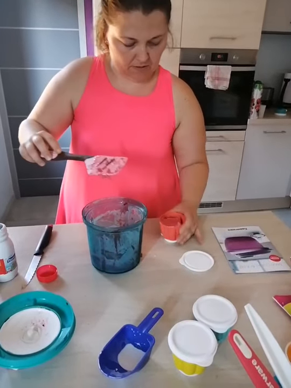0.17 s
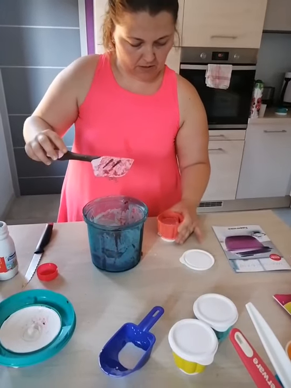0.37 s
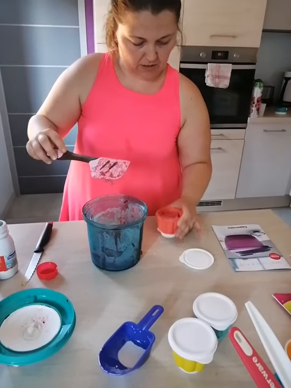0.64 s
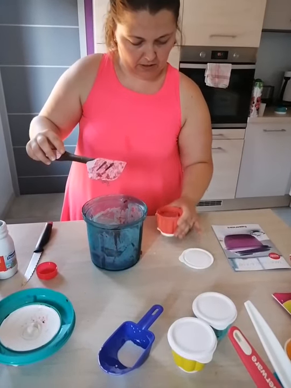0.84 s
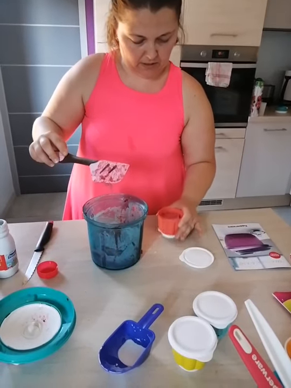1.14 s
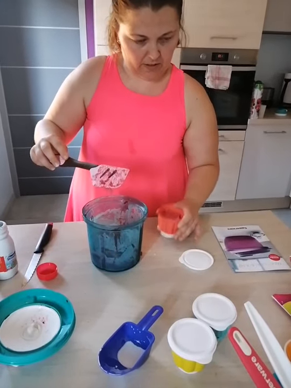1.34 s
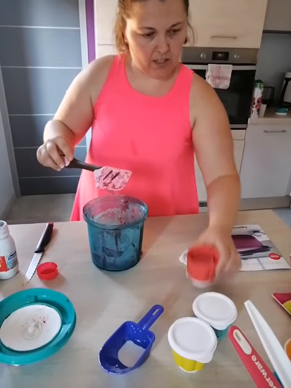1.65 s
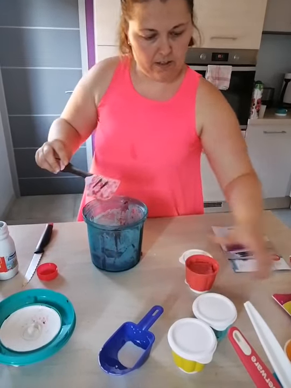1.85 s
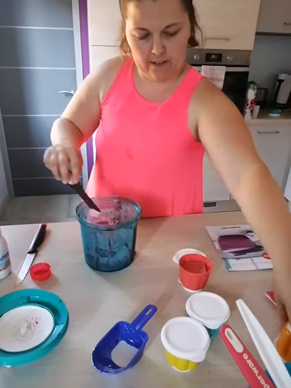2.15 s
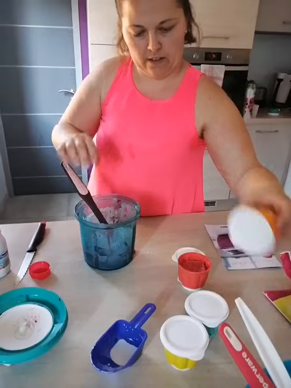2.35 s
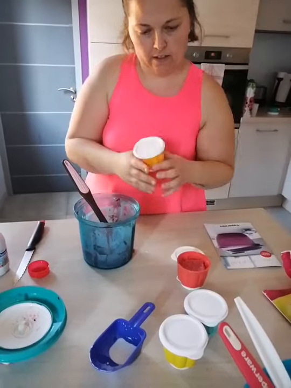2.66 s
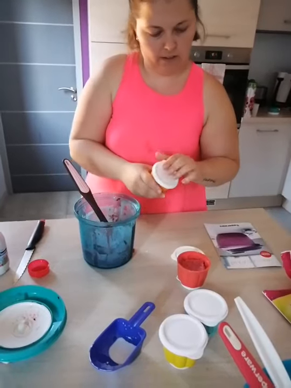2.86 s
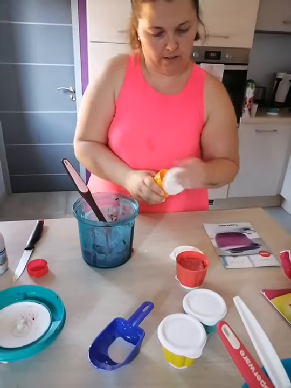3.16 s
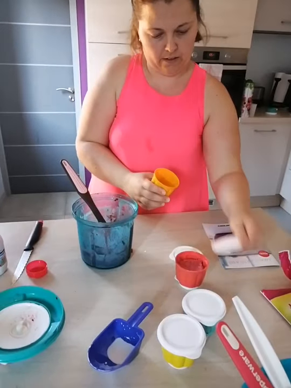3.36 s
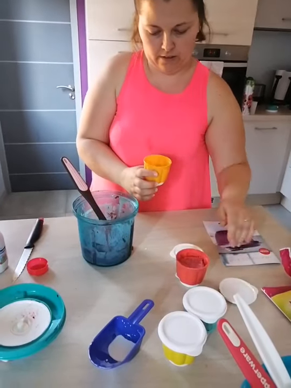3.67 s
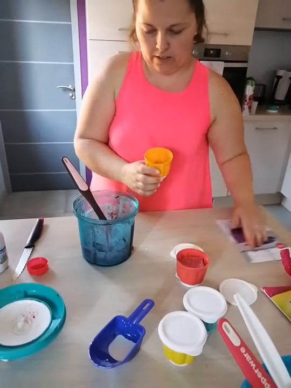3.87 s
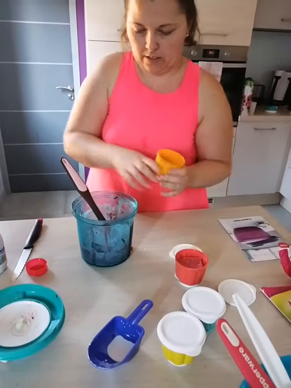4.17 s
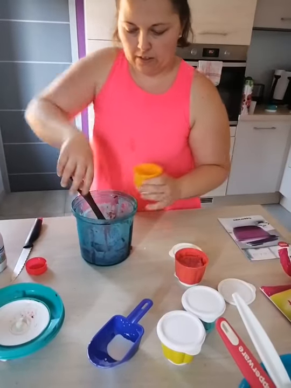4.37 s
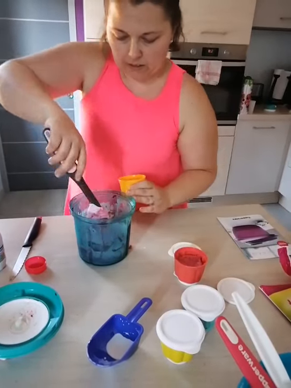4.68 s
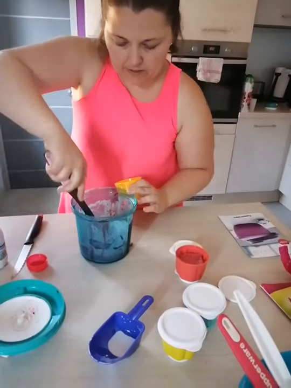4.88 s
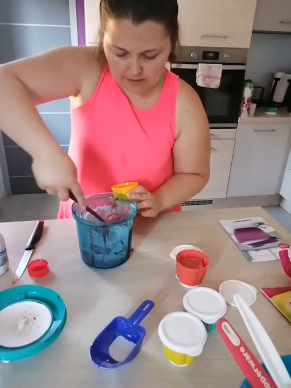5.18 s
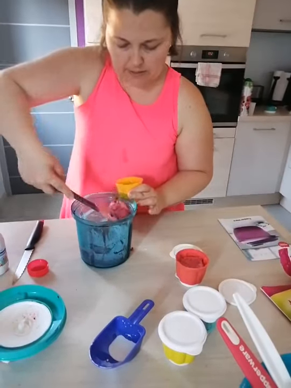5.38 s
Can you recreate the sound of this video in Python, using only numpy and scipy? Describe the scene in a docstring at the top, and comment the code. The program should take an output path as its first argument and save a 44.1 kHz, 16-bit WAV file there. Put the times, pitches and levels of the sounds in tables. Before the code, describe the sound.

In a slightly echoing kitchen, seven loud, hollow knocks of a plastic mould on the counter come first, then a softer thud as it is put down. After the light rattle of a spatula landing in a jug, another mould's lid comes off with a small pop and clatters onto the counter. A short paper rustle and plastic ticks lead into quiet bumping and scraping in the jug.

```python
"""A faint room ring lingers from an earlier knock. A filled plastic mould is knocked seven times on a
kitchen worktop and set down; each impact excites the modes of mould and slab. A spatula drops into a jug.
Fingers rub and thump a second mould, whose lid pops off with a rising air resonance and clatters down.
Paper rustles, plastic ticks, and the spatula bumps and scrapes round the jug by stick-slip friction.
The hard-walled kitchen reverberates after every blow, over a faint steady rumble and hiss."""
import sys
import numpy as np
from scipy import signal
from scipy.fft import rfft, irfft, next_fast_len
from scipy.io import wavfile

SR = 44100
rng = np.random.default_rng(int(sys.argv[2]) if len(sys.argv) > 2 else 0)


def unload_audio(sound):
    """Save the sound as a 16-bit wav file, at the path given as the first command line argument."""
    columns = np.transpose(np.atleast_2d(sound))
    # keep every value between -1 and 1, then stretch to whole-number steps
    steps = np.round(np.clip(columns, -1, 1) * 32767)
    wavfile.write(sys.argv[1], SR, steps.astype(np.int16))


N = 243340
NOW = np.arange(N) / SR  # seconds through the scene
T = np.arange(SR * 3 // 4) / SR  # seconds after a blow


def amp(db):
    """Amplitude ratio of a level in decibels."""
    return 10 ** (np.asarray(db) / 20)


def unit(x):
    """Normalisation to rms 1."""
    return x / np.sqrt(np.mean(x ** 2) + 1e-20)


def along(points, hz):
    """Interpolation of (Hz, value) points on a logarithmic frequency axis."""
    freqs, values = np.transpose(points)
    return np.interp(np.log(hz + 1), np.log(freqs), values)


def fade(t, t60):
    """Exponential decay: 60 dB lost in t60 seconds."""
    return np.exp(-np.log(1000) * t / t60)


def coloured(x, tone):
    """Minimum-phase filtering by a tone curve. Each row of a tone: frequency in Hz, gain in dB."""
    m = 2 * next_fast_len(len(x))
    cepstrum = irfft(np.log(amp(along(tone, np.fft.rfftfreq(m, 1 / SR)))), m)
    cepstrum[1:m // 2] *= 2  # folding onto positive time makes the filter causal
    cepstrum[m // 2 + 1:] = 0
    return irfft(rfft(x, m) * np.exp(rfft(cepstrum)), m)[:len(x)]


def add(track, start, sound):
    """Superposition: a sound joins the track at start seconds."""
    part = track[round(start * SR):][:len(sound)]
    part += sound[:len(part)]


def stroke(start, length, attack, release):
    """Amplitude envelope: linear rise, hold, then 60 dB of decay over the release; all in seconds."""
    return np.clip((NOW - start) / attack, 0, 1) * fade(np.maximum(NOW - start - length, 0), release)


def ring(modes, scatter_db, attack):
    """Free vibration: a sum of damped modes, struck at slightly new strengths each time."""
    waves = sum(amp(db + scatter_db * rng.normal()) * fade(T, t60) * np.sin(2 * np.pi * hz * T)
                for hz, db, t60 in modes)
    return waves * (1 - np.exp(-T / attack))


def crack(tone, t60, spike):
    """Impulsive excitation: a contact spike, then dense, quickly damped vibration."""
    grain = rfft(rng.standard_normal(len(T)) * fade(T, t60))
    # a short blow feeds all frequencies evenly; only their timing is left to chance
    dense = irfft(grain / np.abs(grain), len(T)) * fade(T, 4 * t60)
    dense[0] += spike
    blow = coloured(dense, tone)
    return blow / np.linalg.norm(blow) * np.sqrt(SR / 100)  # the energy of 10 ms at rms 1


def grainy_noise(tone, grain_db, clump_hz):
    """Random amplitude modulation: noise in clumps of varying size, as in friction; rms 1."""
    clumps = np.interp(NOW * clump_hz, np.arange(N), rng.standard_normal(N))
    return unit(coloured(rng.standard_normal(N) * amp(grain_db * clumps), tone))


def echoes(gap, early):
    """Room impulse response: strong near-wall reflections build over gap seconds, then a tail decays."""
    # Each row: frequency in Hz, reverberation time in seconds.
    decay_times = [(100, 0.24), (260, 0.56), (800, 0.77), (2000, 0.7), (5000, 0.69), (8000, 0.51),
                   (13000, .33)]
    # Each row: frequency in Hz, gain of the reverberation in dB.
    room_tone = [(60, -0.5), (170, -6.5), (300, -4), (550, -4), (900, -4.5), (2500, -4.5), (10000, -2)]
    hz, t, spectra = signal.stft(rng.standard_normal(len(T)), SR, nperseg=256)
    spectra = spectra * fade(t, along(decay_times, hz)[:, None])
    tail = signal.istft(spectra, SR, nperseg=256)[1][:len(T)]
    tail = tail * (1 + early * fade(T, 0.11)) * (1 - np.exp(-(T / gap) ** 2))
    return coloured(tail / np.linalg.norm(tail), room_tone)


def heard(x, room, wet_db):
    """Direct sound plus the reverberant field, its convolution with the room's response."""
    return x + amp(wet_db) * signal.fftconvolve(x, room)[:len(x)]


def room_air():
    """Stationary noise: the faint rumble and hiss of the kitchen."""
    # Each row: frequency in Hz, relative spectral density in dB.
    air_tone = [(12, -31.5), (20, -2.5), (50, -6), (109, -11.5), (202, -9.5), (315, -18.5), (491, -15.5),
                (810, -21), (881, -22), (1500, -27), (1630, -26.5), (1920, -24), (3640, -33.5),
                (9390, -43.5), (15500, -50.5)]
    return amp(-65.5) * unit(coloured(rng.standard_normal(N), air_tone))


def lingering_ring():
    """Reverberation: a faint, low room ring lingers from an earlier knock."""
    # Each row: frequency in Hz, relative spectral density in dB.
    ring_tone = [(59, -20), (100, 0.5), (346, -8.5), (497, -4.5), (741, -15.5), (836, -12), (1490, -20),
                 (2520, -19.5), (12000, -39.5), (15600, -74), (22000, -120)]
    envelope = amp(-62.5) * stroke(0, length=0.21, attack=0.0017, release=0.15)
    return envelope * grainy_noise(ring_tone, grain_db=-0.5, clump_hz=60)


def soft_rubs():
    """Sliding friction: fingers on plastic, a hand on paper, the scrape's first hiss."""
    # Each row: start in seconds, length in seconds, level in dB.
    rubs = [(2.535, 0.085, -72), (2.682, .09, -76.5), (2.994, 0.086, -63.5), (3.842, 0.13, -53),
            (4.136, 0.039, -67), (4.542, 0.038, -70), (4.81, 0.15, -63.5)]
    # Each row: frequency in Hz, relative spectral density in dB.
    rub_tone = [(600, -34), (1500, -5), (2200, -2), (3600, -2.5), (4800, -10.5), (7000, -16.5),
                (11000, -22.5), (15000, -28)]
    sliding = sum(amp(db) * stroke(start, length, attack=0.0053, release=0.33)
                  for start, length, db in rubs)
    rubbing = sliding * grainy_noise(rub_tone, grain_db=1.0, clump_hz=71)
    return heard(rubbing, echoes(gap=0.021, early=0.54), wet_db=-20.5)


def stirring():
    """Stick-slip motion: the blade scrapes the jug, chatters in a glide and drags through the mixture."""
    # Each row: start and length in seconds, scrape and drag levels in dB, chatter in Hz, glide in Hz/s.
    strokes = [(4.804, 0.11, -84, -75, 2060, 0), (4.94, 0.21, -67, -64.5, 2224, -600),
               (5.176, 0.067, -68, -59, 1995, 1998), (5.446, .08, -78, -73, 2450, 3)]
    # Each row: frequency in Hz, relative spectral density in dB.
    scrape_tone = [(590, -40), (1000, -6.5), (1120, -10.5), (1240, -10), (1360, -9), (1450, 5.5),
                   (1680, -3.5), (2190, -3), (2530, -3.5), (5410, -12), (6560, -16), (7510, -15),
                   (8230, -20), (10700, -17), (15000, -34)]
    drag_tone = [(47, -56), (80, -17), (134, -1), (168, -8.5), (275, -5), (319, -22), (348, -12),
                 (596, -3.5), (776, -21), (1000, -33), (1300, -59), (2200, -120)]
    attack_s, chatter_over_scrape_db = 0.0276, 1.5
    wall = grainy_noise(scrape_tone, grain_db=3.5, clump_hz=160)
    slips = grainy_noise([(60, -2), (160, -12), (600, -44)], grain_db=0.5, clump_hz=180)
    mixture = grainy_noise(drag_tone, grain_db=5.5, clump_hz=60)
    out = np.zeros(N)
    for start, length, scrape_db, drag_db, chatter_hz, glide in strokes:
        phase = 2 * np.pi * np.cumsum(chatter_hz + glide * (NOW - start)) / SR
        scrape = stroke(start, length, attack_s, release=0.7) * wall
        chatter = stroke(start, length, attack_s, release=1.8) * slips * np.sin(phase)
        drag = stroke(start, length, attack_s, release=0.29) * mixture
        out += amp(scrape_db) * (scrape + amp(chatter_over_scrape_db) * chatter) + amp(drag_db) * drag
    return heard(out, echoes(gap=0.012, early=0.83), wet_db=0.5)


def jug_bumps():
    """Structure-borne sound: the soft blade thuds through jug and worktop; the hard handle clacks."""
    # Each row: start in seconds, level in dB, relative clack and thud in dB.
    bumps = [(2.191, -48, -4.5, -1), (2.2160, -40, 1.5, 3), (2.2219, -42.5, -11, -12),
             (2.244, -51, 5.5, -10), (2.2891, -46, 6, -14), (2.3171, -46, 6, -17),
             (4.6192, -46.5, -34.5, 10.5), (4.63, -49.5, -44, 6), (4.994, -58.5, -9, 6),
             (5.035, -56, -3, -8), (5.4440, -45, -3, 4.5)]
    # Each row: frequency in Hz, relative spectral density in dB.
    jug_tone = [(40, -47), (130, 6.5), (260, 0.5), (420, -1.5), (650, -8.5), (1000, -23), (1700, -10),
                (2300, -14.5), (3200, -25.5), (7000, -37), (11000, -54), (15000, -67)]
    # Each row: frequency in Hz, level in dB, 60 dB decay time in seconds.
    jug_modes = [(203, -1, 0.095), (268, -6.5, 0.35), (411.7, -13, 0.44), (518, -11, 0.21),
                 (1480, -20, 0.098), (1704, -12.5, 0.13), (2169, -5, 0.052), (2270, -10.5, 0.11)]
    worktop_modes = [(51, -11.5, 0.48), (95, -10, 0.12), (133, -5.5, 0.43), (246.6, 0, 0.13)]
    out = np.zeros(N)
    for start, db, clack_db, thud_db in bumps:
        blow = crack(jug_tone, t60=0.045, spike=0.15) + ring(jug_modes, scatter_db=1.5, attack=0.0012)
        blow = coloured(blow, [(400, 0), (1400, clack_db)])
        thud = amp(thud_db) * ring(worktop_modes, scatter_db=1.5, attack=0.003)
        add(out, start, amp(db) * (thud + heard(blow, echoes(gap=0.006, early=0.46), wet_db=4.0)))
    return out


def thin_plastic(contacts, tone, modes, t60):
    """Shell vibration: each contact gives a crack, the modes, and a brief ring set by where it falls."""
    out = np.zeros(N)
    for start, db, bright_db, ring_hz, ring_db in contacts:
        blow = crack(tone, t60, spike=0.14)
        blow += ring(modes + [(ring_hz, ring_db, 0.04)], scatter_db=-2.0, attack=0.00038)
        blow = coloured(blow, [(1800, 0.0066), (6000, bright_db)])
        add(out, start, amp(db) * heard(blow, echoes(gap=0.0044, early=0.34), wet_db=0))
    return out


def plastic_clacks():
    """Shell impacts: a finger thumps the mould, the lid snaps off and clatters, light ticks follow."""
    # Each row: start in seconds, level in dB, treble gain in dB, brief ring in Hz, its level in dB.
    small_contacts = [(2.9382, -59.5, -3, 420, 12.5), (3.1870, -49, -18, 2200, -40),
                      (3.1955, -44.5, 1.5, 2260, 2), (3.2030, -42.5, 6, 2020, -6),
                      (3.2830, -49, -1, 3560, 7), (4.1953, -70.5, 10.5, 3470, -8),
                      (4.2422, -58.5, -2, 1505, -6.5), (5.1980, -68, 7, 2000, 6)]
    lid_landings = [(3.5750, -28.5, -2.5, 1723, 3), (3.6090, -27, 2.5, 2320, 1),
                    (3.6285, -32.5, 1, 2380, 10.5), (3.6600, -34.5, -3.5, 2422, 9),
                    (3.9024, -43.5, 4.5, 2086, 12), (3.9298, -40.5, -4.5, 1913, 7.5),
                    (3.946, -43.5, -16, 1613, 9), (3.968, -48, 2, 1340, 9)]
    # Each row: frequency in Hz, relative spectral density in dB.
    rim_tone = [(100, -6.5), (400, -4.5), (1200, -1.5), (2250, 4), (2800, -6.5), (3600, -7), (5000, -11),
                (7700, -12.5), (8600, -23), (11500, -18.5), (15000, -54.5)]
    lid_tone = [(60, -34), (200, -10), (450, -9.5), (700, -6), (900, -12.5), (1200, -3), (1500, -4.5),
                (2250, 2.5), (3000, -7), (4100, -8.5), (6000, -13.5), (11000, -27.5), (13000, -32.5),
                (16000, -56.5)]
    # Each row: frequency in Hz, level in dB, 60 dB decay time in seconds.
    rim_modes = [(2230, -20, .08), (3730, -4, .08), (3600, -15, 0.068), (3750, -22.5, 0.14),
                 (5230, -13, .04), (6400, -30, .04), (7600, -13, .04)]
    lid_modes = [(1198, -3, 0.039), (1823, -8, 0.058), (2190, -13, 0.22), (2380, -24, .2),
                 (4040, -10, 0.047), (5030, -22, 0.035)]
    taps = thin_plastic(small_contacts, rim_tone, rim_modes, t60=0.12)
    clatter = thin_plastic(lid_landings, lid_tone, lid_modes, t60=0.075)
    return taps + clatter


def lid_pop():
    """Cavity resonance: its pitch climbs as the lid's gap widens; air seeps, bursts in and rings on."""
    pop_s, opening_s, gap_lead_s = 3.2119, 0.006, 0.0036  # the gap is half open just before the pop
    sealed_hz, open_hz = 225.3, 1114
    pop_db, rise_s, pop_t60 = -27, 0.0026, 0.016
    ring_db, ring_t60 = -38, 0.2
    leak_s, leak_db, growth_db_per_s = 0.07, -45, 217
    t = NOW - pop_s
    before, after = np.maximum(-t, 0), np.maximum(t, 0)
    gap = 0.5 + np.arctan((t + gap_lead_s) / opening_s) / np.pi
    phase = 2 * np.pi * np.cumsum(sealed_hz + (open_hz - sealed_hz) * gap) / SR
    leak = amp(leak_db - growth_db_per_s * before) * stroke(pop_s - leak_s, leak_s, opening_s, pop_t60)
    decay = amp(pop_db) * fade(after, pop_t60) + amp(ring_db) * fade(after, ring_t60)
    burst = np.exp(-(before / rise_s) ** 2) * decay
    inrush = unit(coloured(rng.standard_normal(N), [(120, -3), (300, -12), (1200, -45.5)]))
    air = (leak + burst) * (np.sin(phase) + 0.55 * inrush * np.cos(phase))  # the inrush roughens the tone
    return heard(air, echoes(gap=0.007, early=0.51), wet_db=1.5)


def mould_knocks():
    """Impact excites mould and worktop modes: a flat landing gives more bass, one on edge more clack."""
    # Each row: start in seconds, level in dB, relative bass, clack, click and slab flex in dB.
    knocks = [(0.23, -17.5, 11, -3, 3.5, 5), (0.4433, -15.5, 1.5, 0.5, 0.5, -0.5),
              (0.6131, -15.5, -1.5, 1, 2.5, 0.5), (0.792, -21.5, 7.5, 12, 8, 1.5),
              (.9690, -20.5, 1, -5, -2, -2), (1.1223, -19, -1, -1, 1.5, 0.5),
              (1.2790, -22, 4, -2, -0.5, -4.5), (1.7670, -28.5, 9, -9.5, -2, 15)]
    # Each row: frequency in Hz, relative spectral density in dB.
    slap_tone = [(30, -21), (120, -9), (160, -20), (230, 0.5), (380, -2.5), (600, -5.5), (850, 1),
                 (1200, -5.5), (1800, -15), (3000, -25.5), (6000, -33.5), (10500, -38.5), (13000, -44.5),
                 (16000, -65)]
    # Each row: frequency in Hz, level in dB, 60 dB decay time in seconds.
    wall_modes = [(1310, -19, 0.03), (1350, -18, 0.046), (1750, -17, .04), (2143, -19, 0.045),
                  (2782, -20.5, .024), (3790, -23, .016), (5514, -22.5, .014), (7360, -22.5, .01)]
    worktop_modes = [(53.8, -23.5, 1), (214.6, -8.5, 0.2), (250.3, -11.5, 0.43), (290, -4, 0.048),
                     (422.7, -15, 0.21), (538, -12, 0.23), (715, -8.5, 0.2), (855, -10.5, 0.38),
                     (985, -20.5, 0.27), (1068, -18, 0.64)]
    slab_bending = [(135, -11, .28)]
    out = np.zeros(N)
    # nearly the same spot each time, so the knocks share their low echoes while the treble's are new
    shared_echoes = coloured(echoes(gap=0.0067, early=0.5), [(1000, -2), (2500, -10)])
    for start, db, bass_db, clack_db, click_db, flex_db in knocks:
        # the point of contact decides which wall modes speak
        slap = crack(slap_tone, t60=0.052, spike=0.06) + ring(wall_modes, scatter_db=3.5, attack=0.001)
        fresh_echoes = coloured(echoes(gap=0.008, early=0.5), [(1000, -4.3), (2500, -0.5)])
        blow = heard(slap, shared_echoes + fresh_echoes, wet_db=0.83)
        blow += ring(worktop_modes, scatter_db=1.5, attack=0.012)
        reflection = amp(-3.5) * coloured(slap, [(700, -25.5), (2000, -1.5)])  # off things nearby
        add(blow, rng.uniform(0.0015, 0.0045), reflection)
        blow = coloured(blow, [(70, 0), (230, bass_db), (800, 0), (1700, clack_db), (2800, click_db)])
        flex = amp(flex_db) * ring(slab_bending, scatter_db=0.5, attack=0.0082)
        add(out, start, amp(db) * (blow + flex))
    return out


def scene():
    """Superposition of all sources at one microphone."""
    return (mould_knocks() + jug_bumps() + plastic_clacks() + lid_pop()
            + soft_rubs() + lingering_ring() + stirring() + room_air())[None]


def record(dry):
    """Band limiting: the microphone dulls the top octave, and nothing passes above the cutoff."""
    # Each row: frequency in Hz, gain in dB.
    response = [(11000, -0.5), (12500, -4.5), (14000, -11.5), (15600, -7)]
    cutoff_hz = 15600
    m = next_fast_len(N + SR // 2)
    hz = np.fft.rfftfreq(m, 1 / SR)
    return irfft(rfft(dry, m) * amp(along(response, hz)) * (hz < cutoff_hz), m)[..., :N]


dry = scene()
out = record(dry)
unload_audio(out)
```